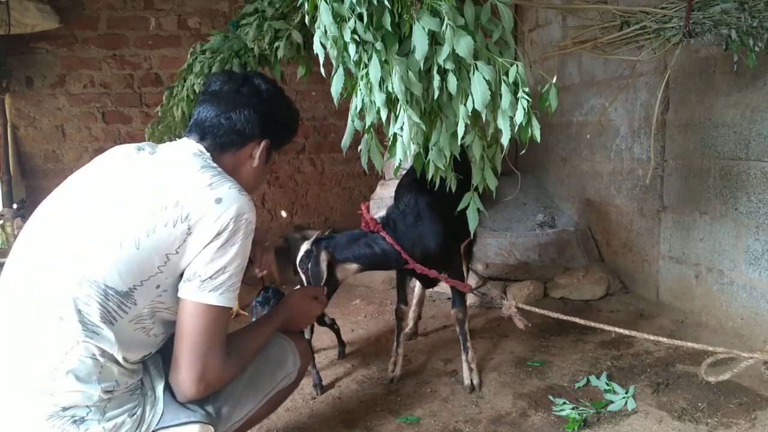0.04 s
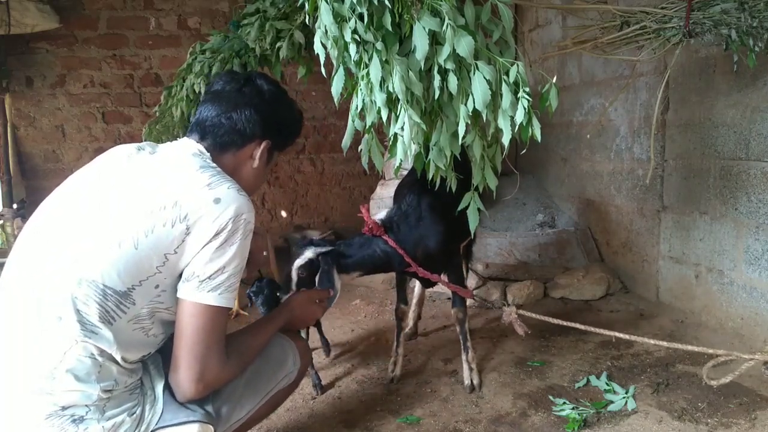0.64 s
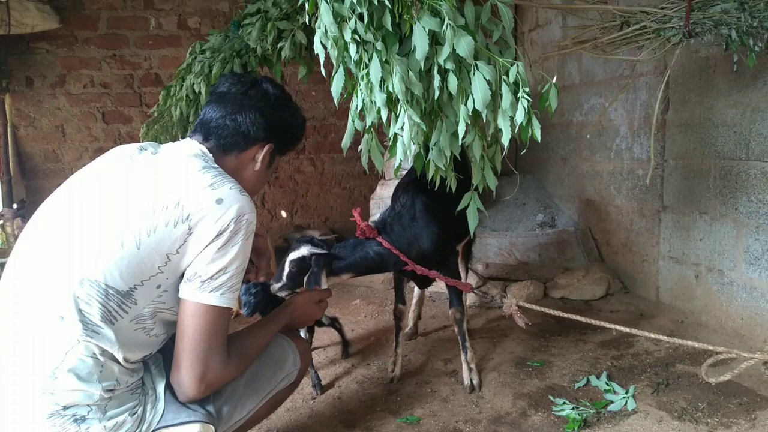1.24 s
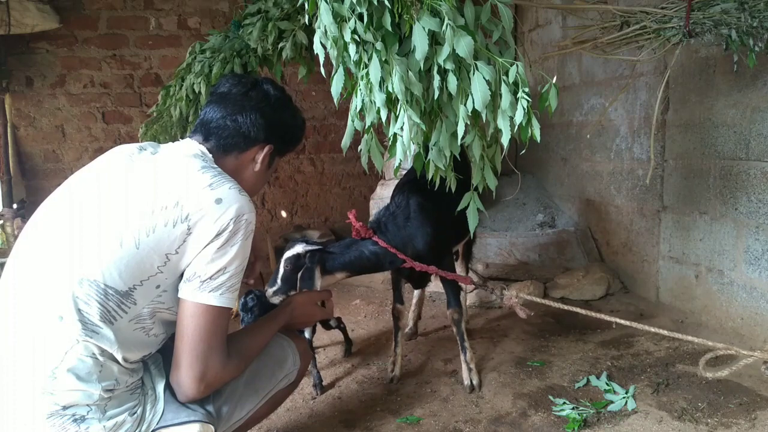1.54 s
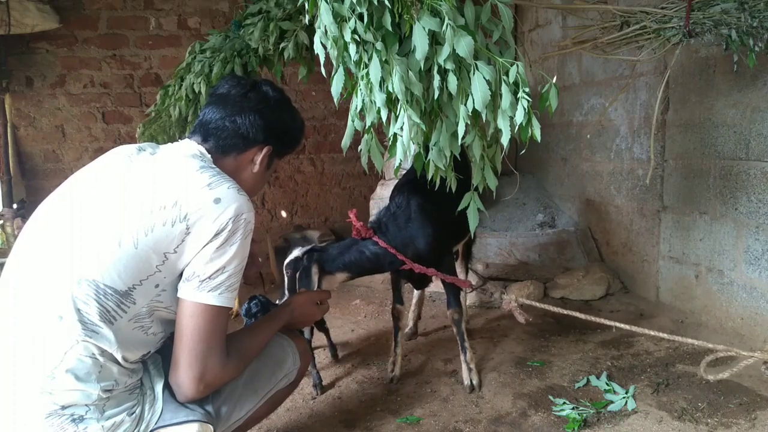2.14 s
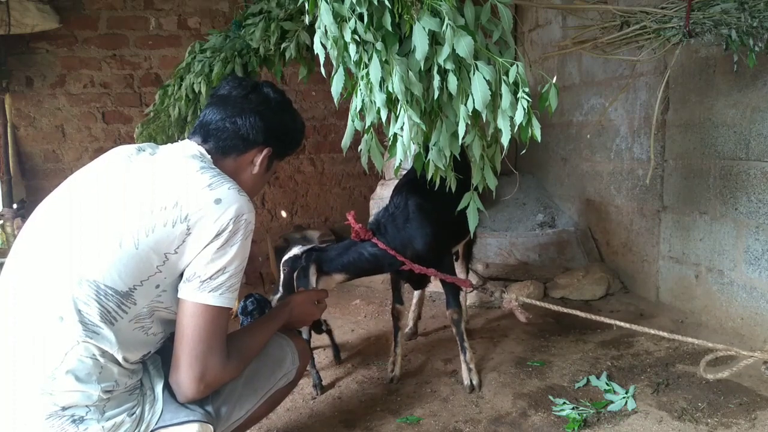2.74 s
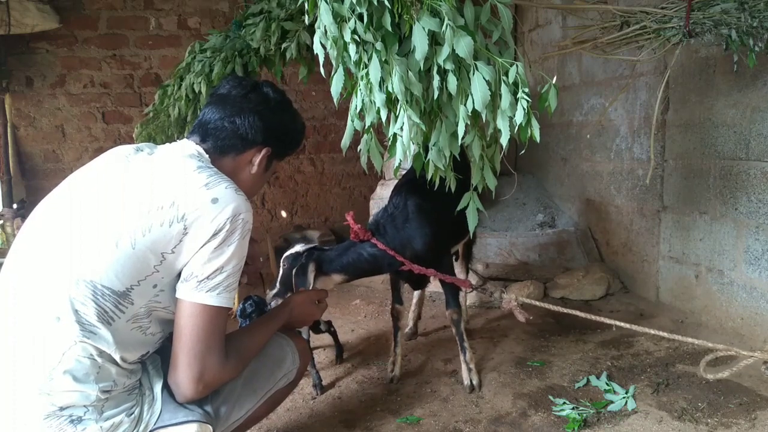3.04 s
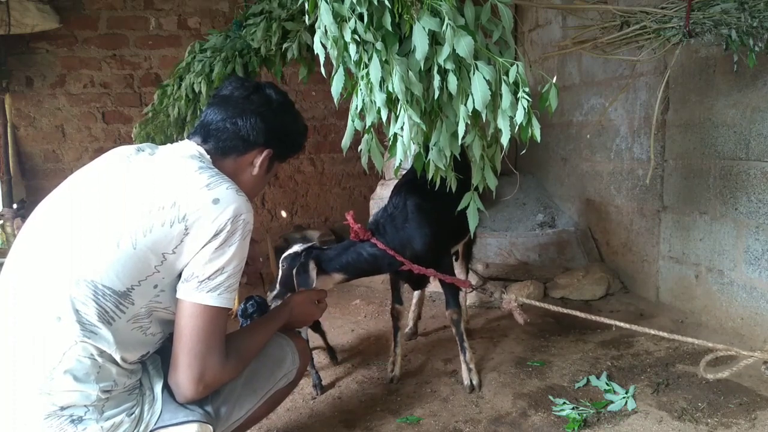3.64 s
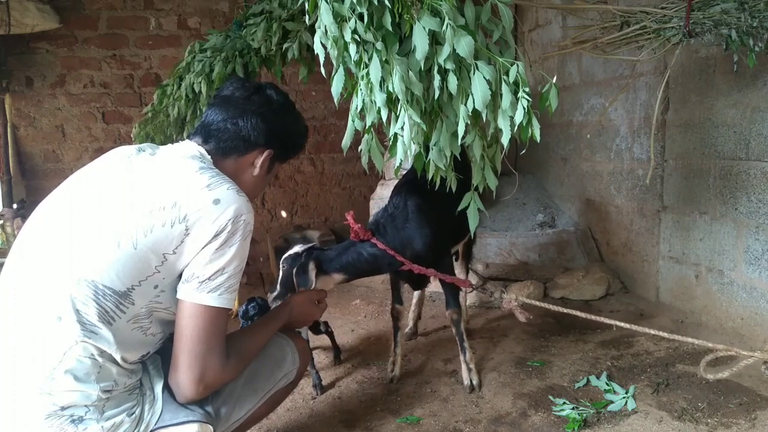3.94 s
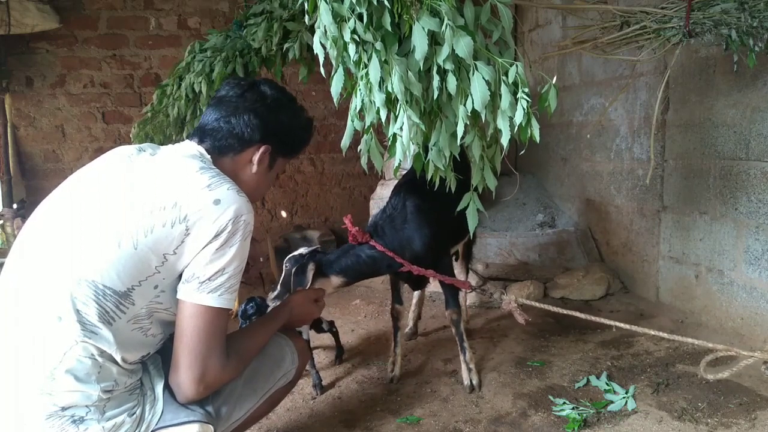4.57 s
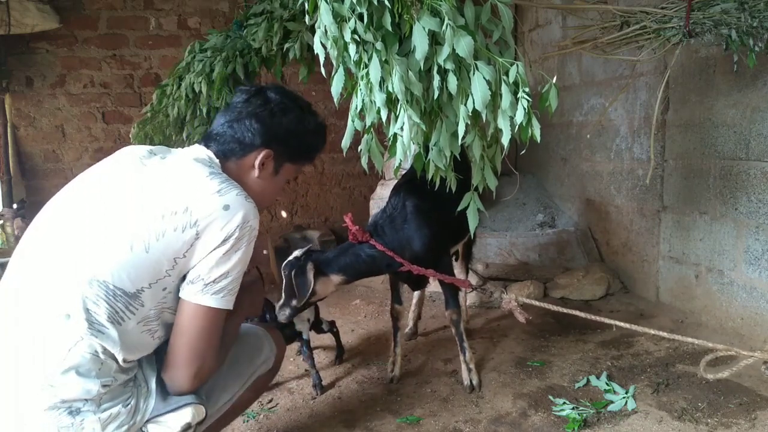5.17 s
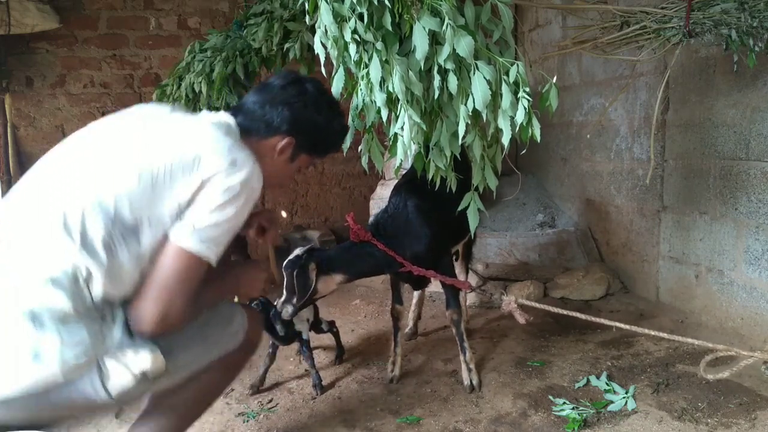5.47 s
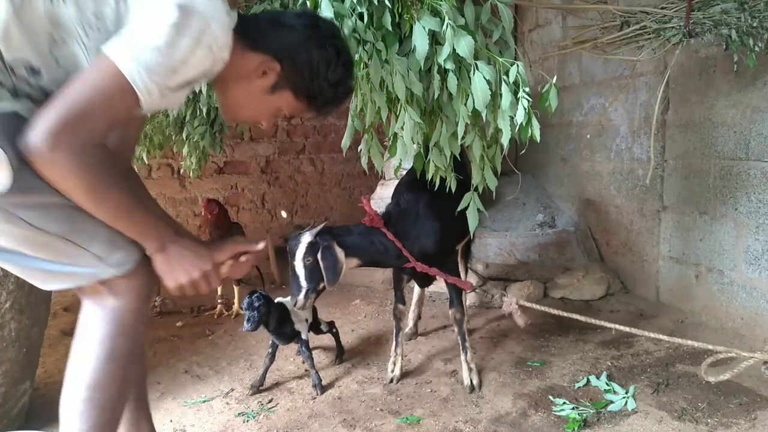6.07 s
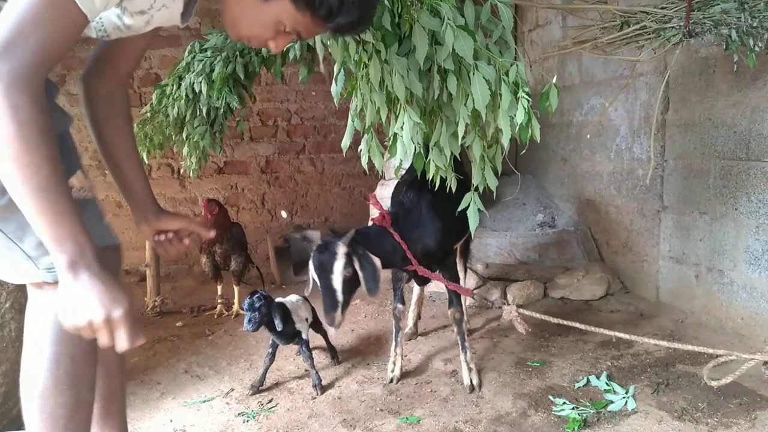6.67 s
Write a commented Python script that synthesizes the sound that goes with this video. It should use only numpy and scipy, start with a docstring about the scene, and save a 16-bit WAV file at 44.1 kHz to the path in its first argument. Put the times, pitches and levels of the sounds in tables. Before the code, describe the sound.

A distant engine throbs and slows over low outdoor rumble, with faint bird chirps and a few brief, close scuffs and ticks.

```python
"""A distant engine throbs outside a quiet, open goat shed, then slowly loses speed; its pulses ring through
fixed low resonances. Close by: short dry friction scuffs (two ring hollow), ticks and soft knocks on the dirt
floor, one swell of cloth rustle as a man gets up. Small birds chirp outside in gliding whistles, over a faint
motor hum and the rumble and hiss of air."""
import sys
import numpy as np
from scipy import signal
from scipy.fft import rfft, irfft
from scipy.io import wavfile
from scipy.ndimage import uniform_filter1d

SR = 44100
rng = np.random.default_rng(int(sys.argv[2]) if len(sys.argv) > 2 else 0)


def file_out(sig):
    """Save sig as 16-bit WAV at sys.argv[1]."""
    # one column per channel
    cols = np.atleast_2d(sig).T
    # limit, then scale
    lim = np.clip(cols, -1, 1)
    pcm = np.round(lim * 32767).astype(np.int16)
    wavfile.write(sys.argv[1], SR, pcm)


N = 304731
T = np.arange(N) / SR
FREQS = np.maximum(np.arange(N // 2 + 1) * SR / N, 1)
SIDE = np.array([[1], [-1]])  # left +, right -

# fixed low resonances the throb rings through, low boom and higher drone under load: f/Hz, width/Hz, gain/dB
BOOM_MODES = [(61.7, 21, 1), (107.77, 19.1, 1.5)]
DRONE_MODES = [(148.4, 13, -2.5), (190.7, 38.7, -11.5), (391.9, 35, -21.5)]
# scuffs: peak t/s, swell/s, slide/s, level/dB, low edge/Hz, high edge/Hz, ring gain/dB, body gain/dB
SCUFF_EVENTS = [ (0.023, 0.011, 0.029, -60, 2900, 5070, -14, 14.5),
                (1.468, .013, 0.012, -59, 1200, 9700, 2.5, -28),
                (3.424, 0.013, 0.023, -55, 1390, 10400, -22, -5),
                (3.498, .003, .005, -66.5, 1900, 7500, -27, -23),
                (3.548, 0.0083, 0.016, -60, 1850, 7700, -34, -18),
                (5.386, 0.0034, 0.012, -66.5, 1900, 8750, -30, -25),
                (5.443, 0.031, 0.014, -58.5, 1660, 9500, -24, -9),
                (5.488, 0.0017, 0.026, -57, 2450, 9100, -17, -4.5),
                (6.505, .02, 0.021, -78.5, 2800, 9000, -28, -23)]
# friction spectrum: f/Hz, relative density/dB
FRICTION_SPECTRUM = [(200, 24), (1000, 9), (1500, 2), (2800, 2.5), (5000, -1.5), (6300, -4.5), (8000, -3.5),
                     (11000, -11.5), (15000, -13)]
# scuff resonances, hollow ring and dull body: f/Hz, width/Hz, gain/dB
HOLLOW_MODES = [(810, 63, 2.5), (1146, 103, -5.5), (1950, 170, -9)]
BODY_MODES = [(233, 142, -2), (478, 113, -6.5), (727, 163, -8.5), (1160, 115, -17)]
# ticks and knocks: t/s, level/dB, centre f/Hz, decay/s
TICK_EVENTS = [ (0.215, -54, 507, 0.026), (1.203, -71, 2420, 0.014), (2.5, -68.5, 3200, 0.0091),
               (3.589, -49.5, 450, 0.0079), (3.978, -53.5, 259, 0.073), (5.445, -48, 2650, .0024),
               (5.4835, -53, 3200, .002), ]
# nearest bird notes: t/s, length/s, start f/Hz, end f/Hz, source level/dB
BIRD_NOTES = [ (0.522, 0.045, 3580, 4020, -79), (0.75, 0.083, 6960, 5430, -85.5),
              (1.713, .11, 5400, 2860, -82), (2.28, .05, 1860, 2300, -73), (2.322, 0.23, 2610, 2730, -84),
              (2.481, 0.024, 2035, 2420, -68), (2.545, 0.03, 1750, 1715, -70),
              (3.137, 0.13, 5120, 4880, -87), (4.0, .12, 1724, 2320, -76), (4.07, .13, 2240, 1950, -79),
              (4.146, .08, 5580, 3610, -79), (4.789, .053, 3230, 3710, -78),
              (5.124, 0.086, 3590, 3170, -79.5), (5.647, .1, 4250, 4260, -82), (5.81, .12, 5100, 4750, -83),
              (6.21, 0.072, 3080, 2750, -79), (6.42, 0.052, 4120, 3120, -75.5)]
# motor harmonics: multiple, relative level/dB
HUM_HARMONICS = [(3, -78.5), (4, -78.5), (5, -75.5), (6, -77.5), (7, -86), (8, -92.5), (9, -92.5),
                 (10, -91), (11, -93.5)]
# outdoor air spectrum: f/Hz, relative density/dB
AIR_SPECTRUM = [(10, 2), (28, 3), (45, -1), (72, 1.5), (88, -11), (130, -7.5), (220, -14), (340, -24.5),
                (530, -25), (690, -31.5), (800, -33), (1450, -47), (3500, -53.5), (12000, -62)]
# stereo width of air and ticks: f/Hz, side minus mid/dB
STEREO_WIDTH = [(25, -1.5), (60, -4), (125, -12), (250, -4.5), (500, -2.5), (1000, 1), (2000, 0),
                (12000, 0)]


def engine(scatter_db=1.67, wander=.003, side_db=-20):
    """Slightly uneven exhaust pulses; only their low boom and drone carry this far."""
    firing_hz, level_db, load_db = throttle()
    firings = np.cumsum(firing_hz * (1 + wander * walk(8))) / SR
    pulses = np.diff(np.floor(firings), prepend=0) * undb(scatter_db * rng.standard_normal(N))
    boom = irfft(rfft(pulses) * ringing(FREQS, BOOM_MODES), N)
    drone = irfft(rfft(pulses) * ringing(FREQS, DRONE_MODES), N)
    throb = unit(boom + undb(load_db) * drone) * undb(level_db)
    return throb + undb(side_db) * np.roll(throb, SR // 200) * SIDE


def throttle(cruise_hz=29.62, drop_hz=1.1, sag_hz_per_s=1.58, cruise_db=-51.5, fade_db_per_s=14):
    """Firing rate, level and drone gain: the engine cruises, coasts, takes some load again, fades."""
    off_at_s, closing_s, boom_decay_s = 2.75, .28, 2
    reload_at_s, reload_s, fade_at_s = 5.09, .5, 6.32
    coasting_s = np.maximum(T - off_at_s, 0)
    closed = np.minimum(coasting_s / closing_s, 1)
    reloaded = np.clip((T - reload_at_s) / reload_s, 0, 1)
    firing_hz = cruise_hz - drop_hz * closed - sag_hz_per_s * coasting_s
    boom_db = 5.5 * closed * np.exp(-coasting_s / boom_decay_s) + 3.5 * reloaded
    fade_db = fade_db_per_s * np.maximum(T - fade_at_s, 0)
    load_db = 1.9 - 13.5 * closed + 5.5 * reloaded
    return firing_hz, cruise_db + boom_db - fade_db, load_db


def scuffs(grain_db=2.0, release_s=.0064, sag_db=4, ear_correlation=.067, pan_left_db=2):
    """Friction grains swell with pressure, sag as the surface slides and die quickly when it stops."""
    out, size = np.zeros((2, N)), 2 ** 15
    t, f = axes(size)
    catch_times_s = t[::size // 800]  # contact catches and slips about every 1 ms
    for peak_s, swell_s, slide_s, db, low_hz, high_hz, ring_db, body_db in SCUFF_EVENTS:
        noise = rng.standard_normal((3, size))
        separate, common = noise[:2], noise[2]
        grains = np.sqrt(ear_correlation) * common + np.sqrt(1 - ear_correlation) * separate
        band = 1 / np.sqrt((1 + (low_hz / f) ** 6) * (1 + (f / high_hz) ** 10))
        rub = unit(irfft(rfft(grains) * band * colour(FRICTION_SPECTRUM, f)))
        catch_db = grain_db * np.interp(t, catch_times_s, rng.standard_normal(len(catch_times_s)))
        ring = undb(ring_db) * unit(irfft(rfft(common) * ringing(f, HOLLOW_MODES)))
        body = undb(body_db) * unit(irfft(rfft(common) * ringing(f, BODY_MODES)))
        start_s = max(peak_s - t[-1] / 2, 0)
        since_peak_s = start_s + t - peak_s
        swell = 1 / (1 + (np.minimum(since_peak_s, 0) / swell_s) ** 2)
        sag = undb(-sag_db * np.clip(since_peak_s / slide_s, 0, 1))
        release = np.exp(-np.maximum(since_peak_s - slide_s, 0) / release_s)
        scuff = (rub * unit(undb(catch_db)) + ring + body) * swell * sag * release
        add(out, start_s, scuff * undb(db + pan_left_db * SIDE / 2))
    return out


def ticks(broad_hz=3000):
    """Tiny knocks and snaps on the dirt floor: the lower, the narrower the band and softer the contact."""
    out, size = np.zeros((2, N)), 2 ** 13
    t, f = axes(size)
    for start_s, db, hz, decay_s in TICK_EVENTS:
        width_hz = hz * np.sqrt(hz / broad_hz)
        mid, side = rfft(rng.standard_normal((2, size)))
        ears = mid + side * colour(STEREO_WIDTH, f) * SIDE
        crack = unit(irfft(ears * resonance(f, hz, width_hz) ** 2))
        attack = np.minimum(t * hz / 2, 1)
        add(out, start_s, undb(db) * crack * attack * np.exp(-t / decay_s))
    return out


def rustle(peak_s=6.04, half_length_s=.28, level_db=-86, flutter_db=1, crinkle_db=2):
    """Cloth rubs and crinkles in one soft swell as the man gets up."""
    spectrum = colour(FRICTION_SPECTRUM) * abs(resonance(FREQS, hz=7500, width_hz=9000)) ** 2
    hiss = unit(irfft(rfft(rng.standard_normal((2, N))) * spectrum, N))
    swell = 1 / (1 + ((T - peak_s) / half_length_s) ** 4)
    return hiss * swell * undb(level_db + flutter_db * walk(14) + crinkle_db * walk(300))


def birds(direct_db=-12, echo_db=-1, yard_t60_s=.17):
    """Gliding whistles from the trees, a fainter flock behind them, all blurred by the yard."""
    out, quiver = np.zeros(N), walk(500)
    for start_s, length_s, from_hz, to_hz, db in BIRD_NOTES + flock():
        progress = np.linspace(0, 1, int(length_s * SR))
        rasp = .009 + .15 * abs(np.log(to_hz / from_hz))  # flat notes pure, wide sweeps raspy
        note_quiver = np.take(quiver, int(start_s * SR) + np.arange(len(progress)), mode="wrap")
        hz = from_hz * (to_hz / from_hz) ** progress * (1 + rasp * note_quiver)
        whistle = np.sqrt(2) * np.sin(2 * np.pi * np.cumsum(hz) / SR)
        add(out, start_s, undb(db) * np.sin(np.pi * progress) * whistle)
    return undb(direct_db) * out + undb(echo_db) * echoes(out, yard_t60_s)


def flock(count=80, centre_hz=3800, spread_oct=.35, glide_oct=.25, typical_s=.045):
    """Faint chirps at random times, each gliding up or down; rows as in BIRD_NOTES."""
    notes = []
    for when, length, pitch, glide, strength in rng.uniform(-1, 1, (count, 5)):
        start_s = (when + 1) / 2 * T[-1]
        from_hz = centre_hz * 2 ** (spread_oct * pitch)
        to_hz = from_hz * 2 ** (glide_oct * (np.sign(glide) + glide) / 2)
        source_db = -87 + 2.5 * strength
        notes.append((start_s, typical_s * 2 ** length, from_hz, to_hz, source_db))
    return notes


def motor_hum(fundamental_hz=98.4, wander=.003026, waver_db=3, gain_db=-1):
    """A far motor's steady harmonics, each wavering a little."""
    phase = 2 * np.pi * np.cumsum(fundamental_hz * (1 + wander * walk(6))) / SR
    out = np.zeros((2, N))
    for multiple, db in HUM_HARMONICS:
        offset_rad = rng.uniform(0, 2 * np.pi) + .5 * rng.standard_normal((2, 1))
        out += np.sqrt(2) * undb(db + waver_db * walk(7)) * np.sin(multiple * phase + offset_rad)
    return undb(gain_db) * out


def air(mid_db=-49, flutter_db=1.53, swell_db=.11):
    """Outdoor rumble and thin hiss; each octave stirs a little, the bass is more alike at both ears."""
    mid, side = rfft(rng.standard_normal((2, N))) * colour(AIR_SPECTRUM)
    gain = undb(mid_db) / np.std(irfft(mid, N))
    ears = mid + side * colour(STEREO_WIDTH) * SIDE
    drift_db = swell_db * walk(1.2)
    out = np.zeros((2, N))
    for octave in range(4, 15):
        band = np.maximum(1 - abs(np.log2(FREQS) - octave), 0)
        stir_db = flutter_db * walk(8.6) / (1 + 2 ** octave / 4000)
        out += irfft(ears * band, N) * undb(drift_db + stir_db)
    return gain * out


def echoes(x, t60_s):
    """Diffuse reflections from 4 ms on, different at each ear."""
    t = T[:SR // 2]
    tail = rng.standard_normal((2, len(t))) * np.exp(-np.log(1000) * t / t60_s) * (t > .004)
    tail /= np.sqrt(np.sum(tail ** 2, axis=1, keepdims=True))
    return signal.fftconvolve(np.atleast_2d(x), tail, axes=1)[:, :N]


def resonance(f, hz, width_hz):
    """Complex response of one resonance, gain 1 at its centre."""
    return 1 / (1 + 1j * (f * f - hz * hz) / (f * width_hz))


def ringing(f, modes):
    """Response of steep resonances in parallel."""
    return sum(undb(db) * resonance(f, hz, width_hz) ** 2 for hz, width_hz, db in modes)


def colour(points, f=FREQS):
    """Gain curve through (f/Hz, gain/dB) points."""
    hz, db = np.transpose(points)
    return undb(np.interp(np.log(f), np.log(hz), db))


def walk(rate_hz):
    """Smooth random drift, rms 1."""
    hold = int(SR / rate_hz)
    steps = np.repeat(rng.standard_normal(N // hold + 1), hold)
    return unit(uniform_filter1d(uniform_filter1d(steps, hold), hold)[:N])


def axes(size):
    """t/s and f/Hz of an FFT block."""
    return T[:size], np.maximum(np.arange(size // 2 + 1) * SR / size, 1)


def add(out, start_s, sound):
    """Mix a sound in at start_s."""
    i = max(int(start_s * SR), 0)
    out[..., i:i + sound.shape[-1]] += sound[..., :N - i]


def undb(db):
    """dB to gain."""
    return 10 ** (np.asarray(db) / 20)


def unit(x):
    """Scale to rms 1."""
    return x / np.sqrt(np.mean(x ** 2))


def scene(shed_db=-15, shed_t60_s=.34):
    """Near sounds with faint shed reflections, over everything outside."""
    near = scuffs() + ticks() + rustle()
    return near + undb(shed_db) * echoes(near, shed_t60_s) + birds() + engine() + motor_hum() + air()


def record(dry):
    """Steep low-pass on the top treble."""
    cutoff_hz = 15750
    return signal.sosfilt(signal.ellip(10, .2, 70, cutoff_hz, fs=SR, output="sos"), dry)


dry = scene()
out = record(dry)
file_out(out)
```